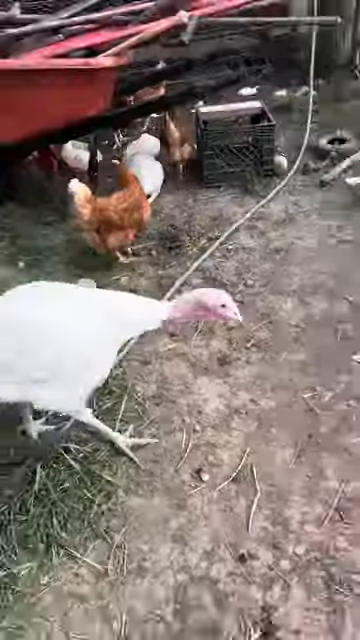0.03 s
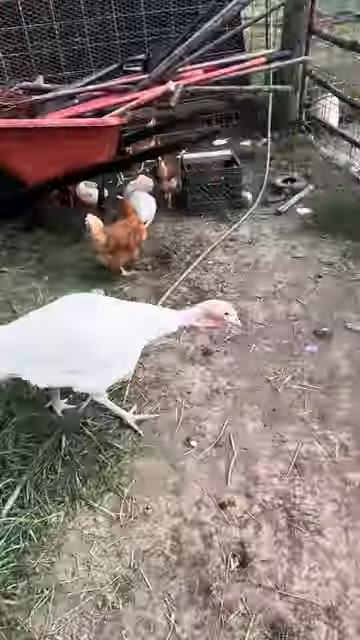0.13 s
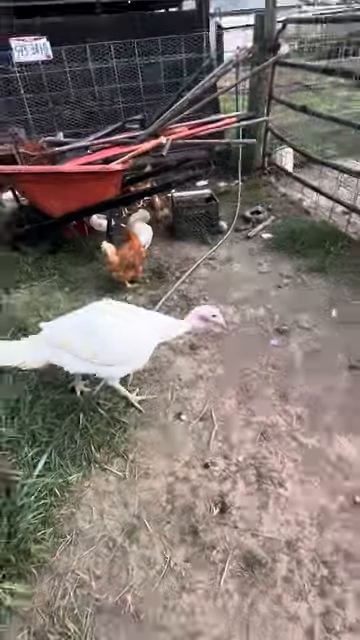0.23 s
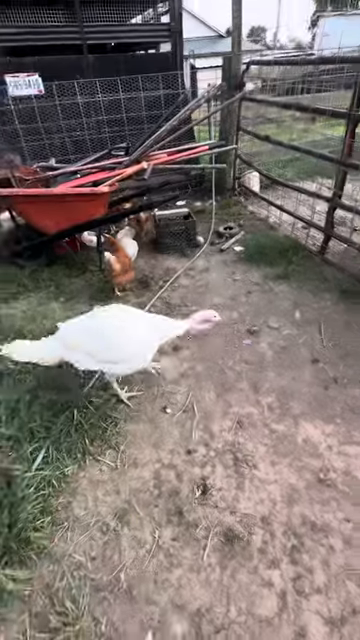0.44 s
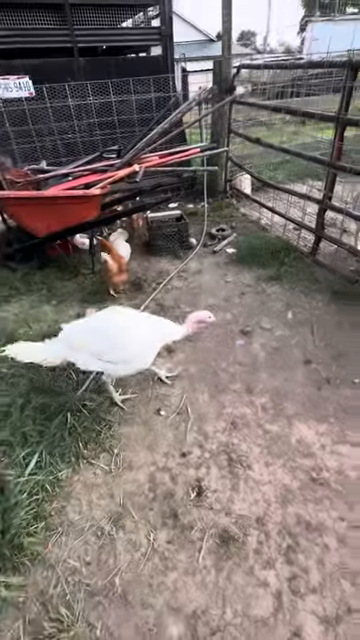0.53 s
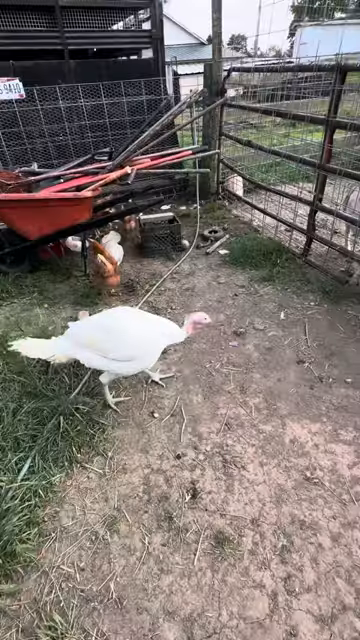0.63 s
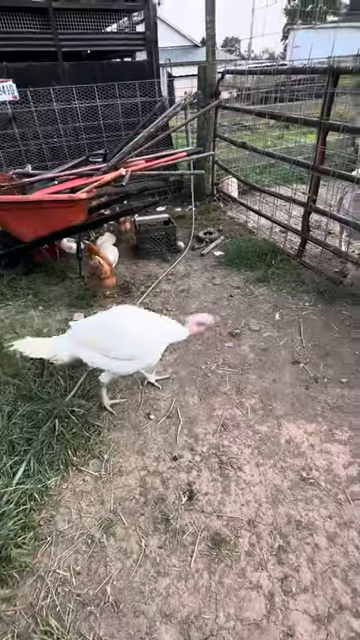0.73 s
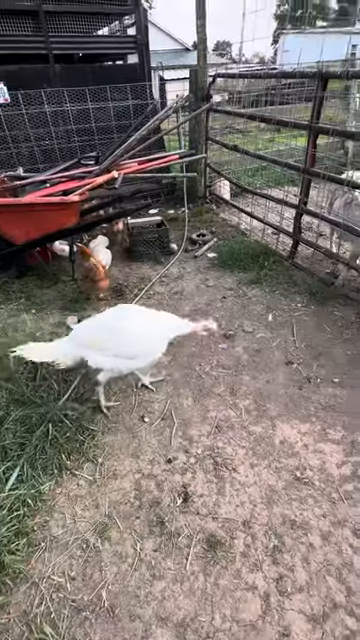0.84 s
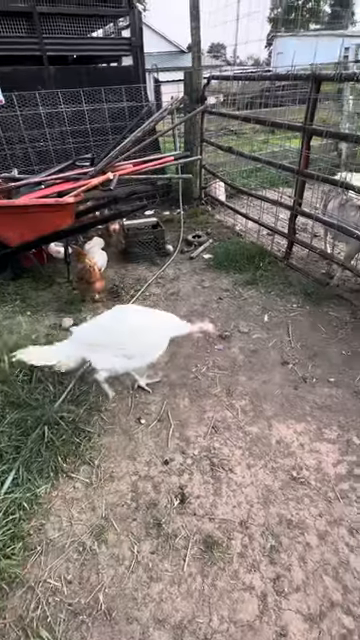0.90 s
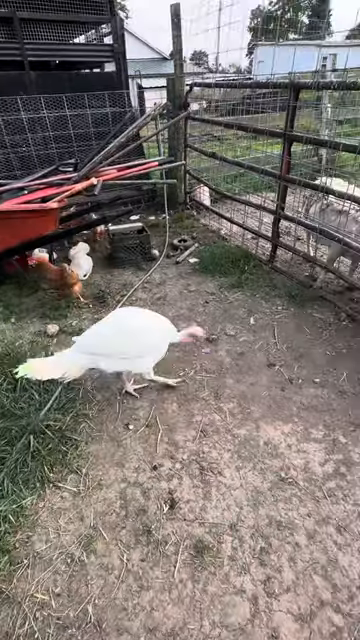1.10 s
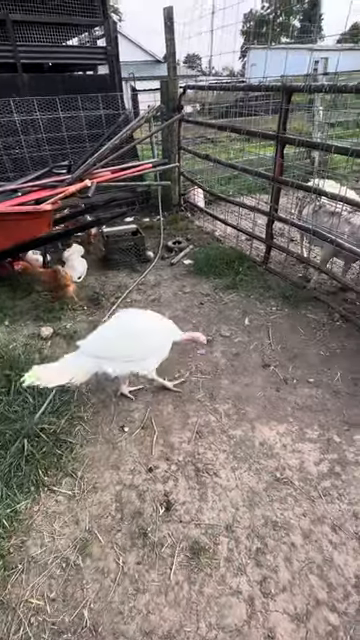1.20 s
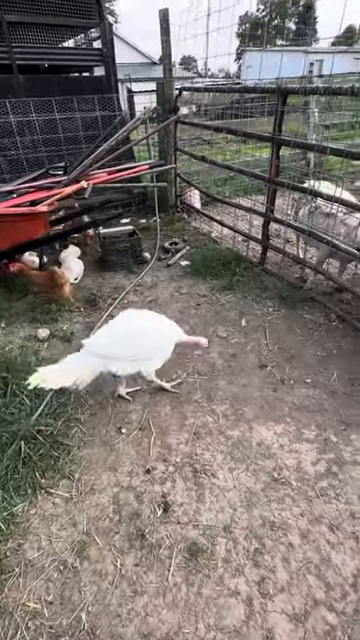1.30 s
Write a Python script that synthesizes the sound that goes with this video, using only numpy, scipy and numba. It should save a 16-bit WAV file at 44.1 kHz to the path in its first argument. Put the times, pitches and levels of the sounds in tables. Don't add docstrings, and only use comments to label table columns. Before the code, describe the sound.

One throaty, stuttering sheep bleat turning hoarse, with wind thumping the microphone and faint birdsong after

```python
import sys
import numpy as np
from scipy import signal
from scipy.fft import rfft, irfft, next_fast_len
from scipy.io import wavfile
from scipy.ndimage import uniform_filter1d, map_coordinates
from numba import njit

SR = 44100
rng = np.random.default_rng(int(sys.argv[2]) if len(sys.argv) > 2 else 0)


def wrap_up_sound(samples):
    columns = np.atleast_2d(samples).T
    tamed = np.clip(columns, -1, 1)
    steps = np.round(tamed * 32767).astype(np.int16)
    wavfile.write(sys.argv[1], SR, steps)


def field_ratio(decibels):
    return 10 ** (np.asarray(decibels, dtype=float) / 20)


N = 59535
T = np.arange(N) / SR

# (middle [s], level [dB], brightness [dB], length [s], rising share of the length)
QUAVERS = [(0.118, -12.5, -0.5, 0.075, 0.48), (0.203, -12.5, 1, .075, .52), (0.285, -12, 3, 0.065, .62),
           (0.367, -12.5, 2.5, 0.067, .6), (0.449, -12.5, 1.5, 0.07, .5), (0.524, -13.5, 0.5, 0.072, .4),
           (0.603, -16.5, 2, 0.079, 0.47), (.683, -17, 0, 0.079, .45), (0.758, -16.5, -0.5, 0.07, .45),
           (0.837, -20, 0.5, 0.063, .52), (0.913, -22, 0, 0.071, .45), (.99, -20.5, -1.5, 0.083, 0.39),
           (1.065, -19, -1, 0.089, .34)]
# (time [s], pitch [Hz])
PITCH = [(0.08, 153.2), (0.116, 155.4), (0.199, 151.9), (0.281, 153.4), (0.362, 153), (0.448, 154.2),
         (0.525, 156.4), (0.604, 155.8), (0.683, 152.8), (0.76, 152.4), (0.836, 149.9), (0.913, 147.3),
         (0.992, 140.4), (1.07, 138.3), (1.12, 138.5)]
# (time [s], first [Hz], second [Hz], third [Hz], fourth [Hz])
MOUTH = [(.1, 694, 1624, 2110, 2480), (.37, 765, 1580, 2120, 2640), (.6, 769, 1545, 2223, 2800),
         (.76, 728, 1571, 2430, 2850), (.9, 631, 1613, 2245, 2827), (1.07, 722, 1515, 2336, 2810)]
# (width [Hz], level [dB])
MOUTH_WIDTHS = [(90, -2.5), (230, -3.5), (240, -5)]
# (first, second, third, fourth) [share of its Hz]
LIFT_SHARE = (-0.045, -0.017, 0.11, 0.016)
# (time [s], nose [dB], second resonance [dB],
# upper resonances [dB], hiss [dB], first resonance width [Hz])
VOWEL = [(.1, -34, -6.5, -9, -33.5, 66), (.22, -15.5, -10.5, -17, -39.5, 55),
         (.37, -14.5, -12.5, -13.5, -39, 52), (.52, -36, -7.5, -10.5, -35.5, 55),
         (.66, -16, -3.5, -11.5, -37, 78.4), (.76, -6.5, -4.5, -11.5, -39.5, 97),
         (.9, -5, -6, -9.5, -39, 200), (.99, -12, -8, -16, -48, 69.8), (1.08, -10, -9.5, -16, -47, 55)]
# (centre [Hz], width [Hz], level [dB])
SKULL = [(1056, 360, -20), (1330, 62, -40), (3190, 55, -23.5)]
# (centre [Hz], width [Hz], level [dB])
CRACK = [(3130, 230, 1.5), (4360, 460, 0), (5400, 900, -10.5)]
# (frequency [Hz], level [dB per Hz])
HISS = [(2500, -9), (3300, 9.5), (4600, 3.5), (6500, -1.5), (9000, -12), (11000, -43.5), (15700, -28)]
# (start [s], end [s])
TIRED_S = (.84, 1.0)
# (delay [s], level [dB])
GROUND = [(.0023, -14.5), (.0041, -11.5), (.0078, -47.5)]

# (time [s], level [dB])
WIND = [(0.0, -37.5), (0.176, -45.5), (0.202, -40.5), (0.244, -49), (0.308, -37), (0.342, -60),
        (0.386, -26.5), (0.45, -49), (0.496, -39.5), (0.59, -39), (0.616, -32.5), (0.822, -45.5),
        (0.876, -35.5), (0.988, -39.5), (1.198, -32.5), (1.262, -57), (1.288, -34), (1.35, -28.5)]
# (frequency [Hz], level [dB per Hz])
RUMBLE = [(12, -42), (25, -17.5), (70, -2.5), (150, -6.5), (300, -12.5), (500, -12.5), (1000, -25.5),
          (1800, -86)]
# (frequency [Hz], left-right likeness [-1 to 1])
WIND_ALIKE = [(30, -0.29), (60, -0.1), (110, -0.74), (200, -0.81), (500, -0.93)]
# (time [s], level [dB], pitch [Hz], length [cycles])
THUMPS = [
    (0.386, -20.5, 260, 0.52),
    (0.5, -28.5, 163, 1.5),
    (0.635, -34.5, 269.6, 7.9),
    (0.584, -43, 354, 6.6),
    (1.155, -26, 197, 0.53),
    (1.187, -23.5, 73, 0.45),
    (1.333, -22, 182, 0.5),
]

# (time [s], pitch [Hz], level [dB])
CHIRPS = [
    [(1.108, 4900, -60), (1.116, 5450, -55), (1.124, 5600, -62)],
    [(1.125, 3500, -58), (1.13, 4400, -55), (1.136, 4520, -54), (1.149, 4480, -55), (1.16, 3500, -52),
     (1.165, 3350, -60)],
    [(1.163, 3900, -60), (1.169, 3800, -55), (1.174, 3400, -61)],
    [(1.184, 3350, -64), (1.2, 3230, -53), (1.212, 3200, -54), (1.24, 2950, -62)],
    [(1.238, 5200, -64), (1.243, 6700, -58), (1.248, 7150, -57), (1.255, 6850, -57), (1.265, 6200, -63),
     (1.275, 5800, -65)],
    [(1.255, 5650, -58), (1.268, 5330, -55), (1.279, 5000, -49), (1.285, 5300, -58), (1.298, 5200, -63)],
    [(1.292, 3800, -58), (1.298, 4050, -55), (1.312, 4000, -61), (1.324, 3700, -56), (1.332, 3750, -62),
     (1.342, 3900, -54), (1.349, 3950, -53)],
    [(1.302, 4800, -60), (1.31, 4830, -55), (1.32, 4750, -59), (1.324, 4300, -61)],
    [(1.326, 5300, -57), (1.331, 5100, -53), (1.336, 5200, -60), (1.348, 5600, -62)],
]

# (frequency [Hz], level [dB per Hz])
AIR = [(300, -34), (500, 5), (1200, 1), (2500, -11), (4000, -10.5), (6000, -11), (10000, -18.5),
       (15700, -39.5)]
# (frequency [Hz], left-right likeness, clipped to -1 to 1)
AIR_ALIKE = [(500, -2), (1500, 0.013), (6000, 0.31), (10000, 0.044), (11500, -1.03)]
# (centre [Hz], width [Hz], level [dB])
CLUCK = [(584, 146, -6), (1150, 210, -5), (2070, 760, -8.5)]
# (time [s], length [s], level [dB])
RUSTLES = [
    (0.153, 0.067, -37),
    (0.348, 0.016, -32),
    (0.382, 0.074, -38.5),
    (0.524, 0.013, -40.5),
    (0.58, 0.043, -48.5),
    (0.81, .025, -49.5),
    (1.123, 0.055, -53),
    (.975, .003, -42),
]
# (frequency [Hz], level [dB per Hz])
STRAW = [(3000, -32), (5000, -5), (8000, -1.5), (11000, -11), (15700, -10)]

# (frequency [Hz], left over right [dB])
PAN_BEFORE = [(500, -4.5), (750, -9.5), (1150, -5.5), (1730, -2.5), (2500, 5), (4500, -2.5), (9000, 0)]
# (frequency [Hz], left over right [dB])
PAN_AFTER = [(500, 2), (750, -7), (1150, -6), (1730, -1), (2500, -4.5), (4500, -15.5), (9000, -5)]
# (frequency [Hz], left leads by [radians])
LEAD = [(340, -3), (690, -0.96), (950, -1.2), (1210, 2), (2150, -1.17), (2840, -2.02), (5000, 1),
        (9000, -1.5), (11500, -11)]
# (start [s], end [s])
TURN_S = (.78, 1.1)
# (frequency [Hz], time to fall 60 dB [s])
YARD = [(500, 0.1), (2500, 0.19), (10000, 0.044)]


def unit(x):
    return x / np.sqrt(np.mean(x ** 2) + 1e-20)


def along(points, hz):
    f, v = np.transpose(points)
    return np.interp(np.log(hz + 1), np.log(f + 1), v)


def curves(rows):
    s, *cols = np.transpose(rows)
    return [np.interp(T, s, c) for c in cols]


def wobble(rate):
    knots = rng.standard_normal(int(N * 400 / SR) + 4)
    return map_coordinates(knots, [T * min(rate, 400)])


def filtered(x, response):
    m = next_fast_len(N + SR // 2)
    return irfft(rfft(x, m) * response(np.fft.rfftfreq(m, 1 / SR)), m)[..., :N]


def peaks(table):
    def response(f):
        total = 0
        for k, (centre, width, db) in enumerate(table):
            ring = 1j * f * width / (centre * centre - f * f + 1j * f * width)
            total = total + (-1) ** k * field_ratio(db) * ring
        return total
    return response


def rush(spectrum, alike):
    def mid_side(hz):
        angle = np.arccos(np.clip(along(alike, hz), -1, 1)) / 2
        return field_ratio(along(spectrum, hz)) * [np.cos(angle), np.sin(angle)]
    mid, side = filtered(rng.standard_normal((2, N)), mid_side)
    return unit(np.array([mid + side, mid - side]))


@njit
def resonate(x, hz, width, sr):
    y, z = np.zeros(len(x)), 0j
    for i in range(len(x)):
        r = np.exp(-np.pi * width[i] / sr)
        z = z * r * np.exp(2j * np.pi * hz[i] / sr) + (1 - r) * x[i]
        y[i] = 2 * z.imag
    return y


def quavers():
    depth_db, roundness = 22.5, 2.5
    middle, level_db, bright_db, length, rise = np.transpose(QUAVERS)[:, :, None]
    d = (T - middle) / length
    u = np.where(d < 0, -d / rise, d / (1 - rise))
    swells = field_ratio(level_db - depth_db * np.minimum(u, 4) ** roundness)
    swell = swells.sum(0)
    stage = np.sum(swells * np.clip(2 * d, -1, 1), 0) / swell
    stage = uniform_filter1d(stage, size=300)
    loudest = swells.argmax(0)
    bright = uniform_filter1d(bright_db[loudest, 0], size=400)
    return swell, stage, bright, swell / field_ratio(level_db[loudest, 0])


def throat(swell, stage):
    jitter, scatter_db, closing = .011, 1.8, .4
    bend = 1 - 0.01 * stage - 0.03 * stage ** 2
    cycles = np.cumsum(curves(PITCH)[0] * bend * (1 + jitter * wobble(90))) / SR
    effort = swell * field_ratio(scatter_db * rng.standard_normal(400))[cycles.astype(int)]
    snap = effort * unit(np.diff(np.floor(cycles), prepend=0))
    gate = np.exp(-(cycles % 1) / closing)
    puff = effort * unit(gate * rng.standard_normal(N))
    return effort, snap, gate, puff


def mouth(snap, puff, stage, first_width):
    breathy, tired_breath = .5, .75
    tired = np.interp(T, TIRED_S, [0, tired_breath])
    shapes = [(first_width * np.exp(-0.6 * stage), 0)]
    shapes += [(np.full(N, w * 1.), db) for w, db in MOUTH_WIDTHS]
    rings = []
    for k, (hz, (width, db), lift) in enumerate(zip(curves(MOUTH), shapes, LIFT_SHARE)):
        push = snap + breathy * (min(k + 0.64, 1.3) + tired) * puff
        rings.append(field_ratio(db) * resonate(push, hz * (1 + lift * stage), width, SR))
    return rings


def sheep():
    early_db, late_db, first_tighter = 3, 6, 0.86
    low_hz, top_hz = 525, 2870
    hiss_steady, hiss_grows, crack_db = 0.16, 0.44, -0.5
    swell, stage, bright_db, even_swell = quavers()
    effort, snap, gate, puff = throat(swell, stage)
    nose_db, second_db, upper_db, hiss_db, first_width = curves(VOWEL)
    first, second, third, fourth = mouth(snap, puff, stage, first_width)

    bright = field_ratio(bright_db - early_db * stage)
    tight = np.abs(uniform_filter1d(even_swell, size=200)) ** first_tighter
    upper = field_ratio(upper_db) * (third - field_ratio(late_db * stage) * fourth)
    voice = tight * first + bright * (upper - field_ratio(second_db) * second)
    voice = voice + filtered(snap, peaks(SKULL))
    voice = voice + field_ratio(nose_db) * filtered(snap, peaks([(595, 50, 0)]))
    band = signal.butter(6, [low_hz / (SR / 2), top_hz / (SR / 2)], "band", output="sos")
    voice = 10.0 * signal.sosfilt(band, voice)

    crack = 10.0 * filtered(snap, lambda f: peaks(CRACK)(f) ** 2)
    crack = field_ratio(crack_db + hiss_db) * bright * crack
    hiss = unit((gate + hiss_steady) * rush(HISS, [(1000, 1.0)])[0])
    hiss = field_ratio(hiss_db) * bright * effort ** hiss_grows * hiss

    def echoes(f):
        return 1 + sum(field_ratio(db) * np.exp(-2j * np.pi * f * lag) for lag, db in GROUND)
    return filtered(voice + crack + hiss, echoes)


def wind():
    thump_side = 0.94
    lumps = field_ratio(1.7 * np.array([wobble(29.13), wobble(30.315)]))
    out = field_ratio(curves(WIND)[0] + 5.5) * unit(lumps * rush(RUMBLE, WIND_ALIKE))
    for s, db, hz, turns in THUMPS:
        u = (T - s) * hz
        fade = field_ratio(db) * np.exp(-(u / turns) ** 2)
        shared = np.cos(2 * np.pi * u)
        opposite = np.sin(2 * np.pi * u) * np.array([[1], [-1]])
        out += fade * (shared + thump_side * min(hz / 200, 1) * opposite)
    return out


def birds():
    fuzz, song_db = .4, 1.5
    out = np.zeros(N)
    for note in CHIRPS:
        start = (note[0][0] - .004, note[0][1], -110)
        end = (note[-1][0] + .006, note[-1][1], -110)
        hz, db = curves([start] + list(note) + [end])
        hoarse = 1 + fuzz * wobble(260)
        out += field_ratio(db + song_db) * hoarse * np.sin(2 * np.pi * np.cumsum(hz) / SR)
    return out


def hen():
    middle_s, length_s, level_db = 0.037, 0.043, -36
    cluck = unit(filtered(rng.standard_normal(N), lambda f: peaks(CLUCK)(f) ** 2))
    return field_ratio(level_db) * np.exp(-((T - middle_s) / length_s) ** 2) * cluck


def straw():
    moves = sum(field_ratio(db) * np.exp(-np.abs(T - s) * 2 / length) for s, length, db in RUSTLES)
    crackle = field_ratio(2.75 * wobble(300))
    return moves * unit(crackle * rush([(1500, -73)] + STRAW, AIR_ALIKE))


def far_air():
    air_db, lull_db, lull_s, lull_length_s = -48, 5, 1.23, 0.083
    hum_hz, hum_width_hz, hum_db = 595, 35, -53
    lull = lull_db * np.exp(-((T - lull_s) / lull_length_s) ** 2)
    air = field_ratio(air_db + 1.5 * wobble(8.64) - lull) * rush(AIR, AIR_ALIKE)
    narrow = peaks([(hum_hz, hum_width_hz, 0)])
    hum = unit(filtered(rng.standard_normal(N), lambda f: narrow(f) ** 2))
    return air + field_ratio(hum_db) * hum


def yard(x):
    hz, t, z = signal.stft(rng.standard_normal((2, SR // 3)), SR, nperseg=256)
    fade = field_ratio(-60 * t / along(YARD, hz)[:, None])
    tail = signal.istft(z * fade, SR, nperseg=256)[1]
    late = np.pad(x, (300, 0))[None]
    return signal.fftconvolve(late, tail / np.linalg.norm(tail[0]), axes=1)[:, :N]


def ports(x):
    side = np.array([[.5], [-.5]])

    def view(pan):
        def response(hz):
            return field_ratio(side * along(pan, hz)) * np.exp(1j * side * along(LEAD, hz))
        return filtered(x, response)
    turn = np.interp(T, TURN_S, [0, 1])
    return (1 - turn) * view(PAN_BEFORE) + turn * view(PAN_AFTER)


def scene():
    yard_db, song_echo_db = -13, -7
    voice, song = sheep(), birds()
    animals = ports(voice + song)
    echoes = field_ratio(yard_db) * yard(voice) + field_ratio(song_echo_db) * yard(song)
    return animals + echoes + wind() + hen() + straw() + far_air()


def roll_off(x):
    return signal.sosfilt(signal.butter(12, 15750, fs=SR, output="sos"), x)


def record(dry):
    top, knee = .95, 6
    soft = dry / (1 + np.abs(dry / top) ** knee) ** (1 / knee)
    return roll_off(soft)


dry = scene()
out = record(dry)
wrap_up_sound(out)
```